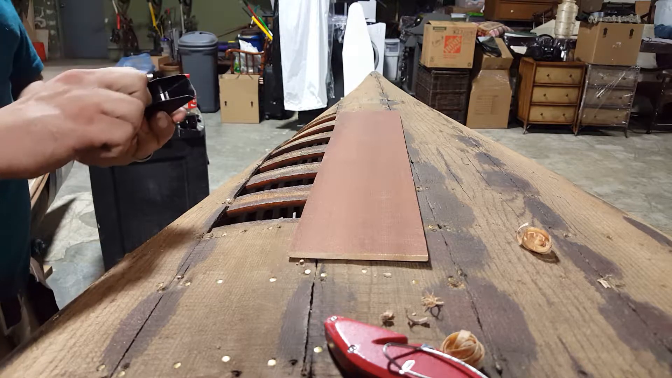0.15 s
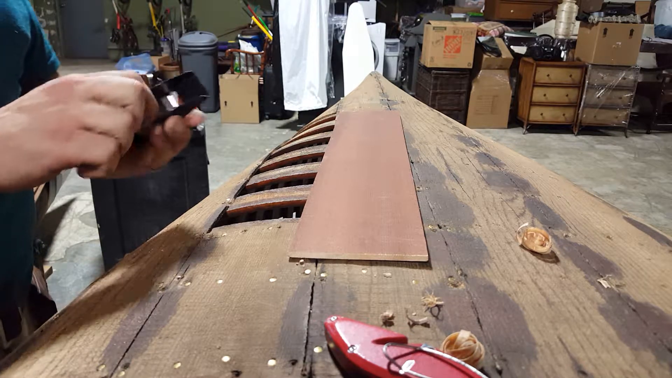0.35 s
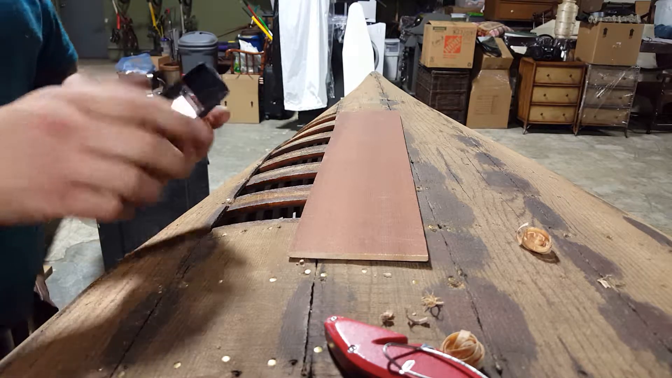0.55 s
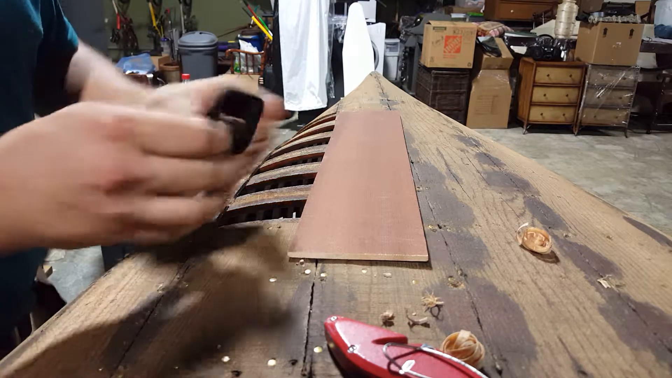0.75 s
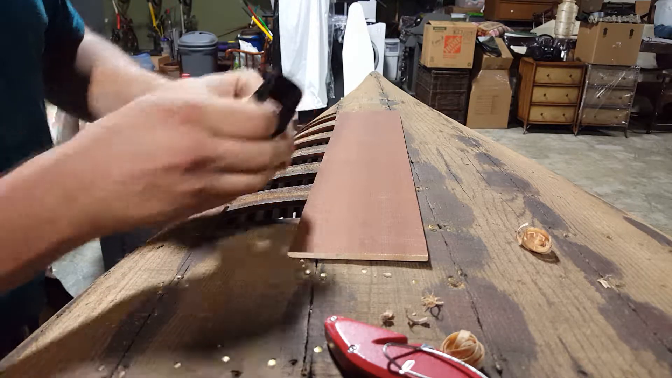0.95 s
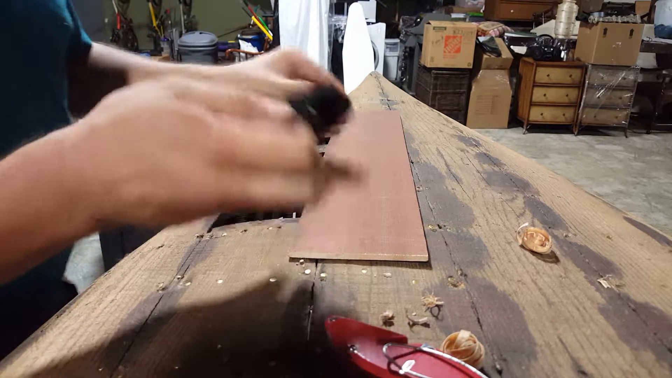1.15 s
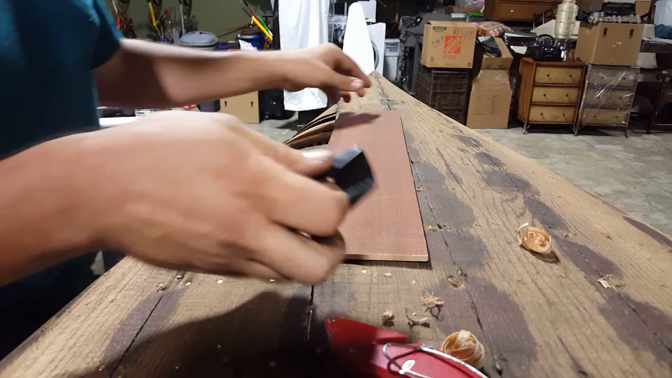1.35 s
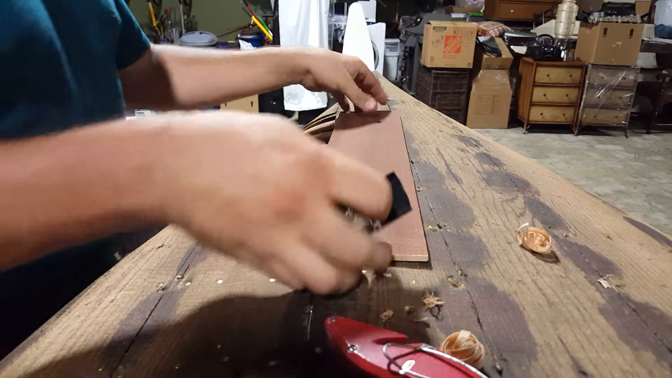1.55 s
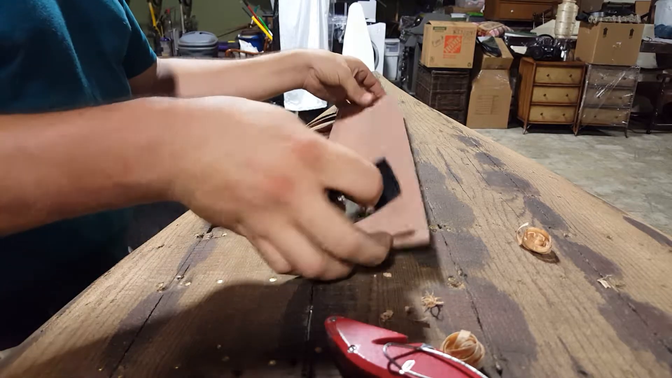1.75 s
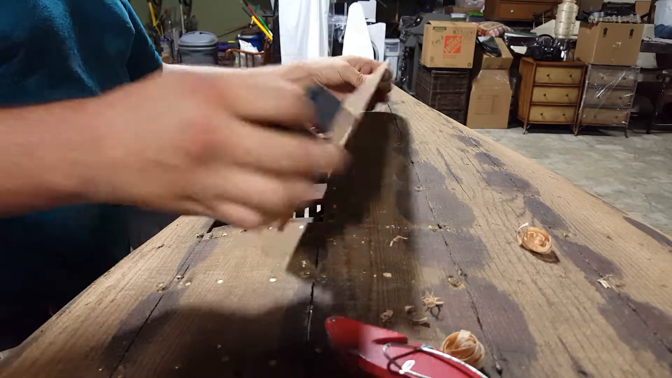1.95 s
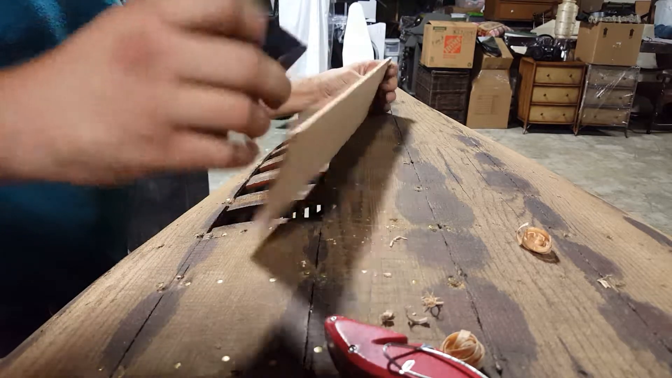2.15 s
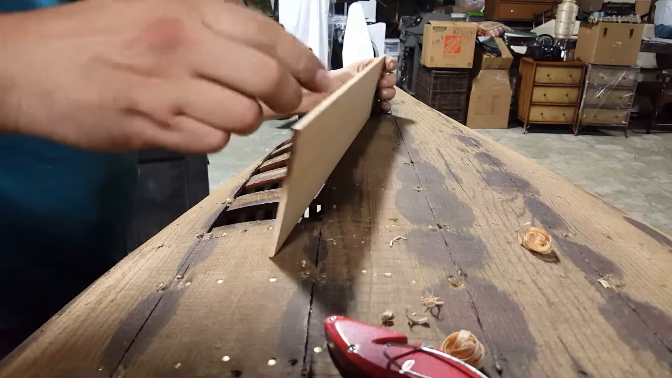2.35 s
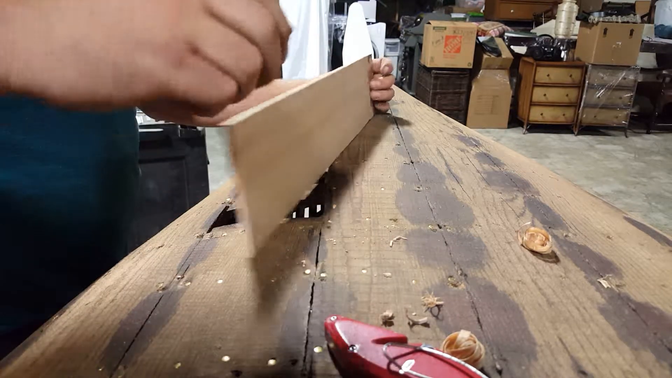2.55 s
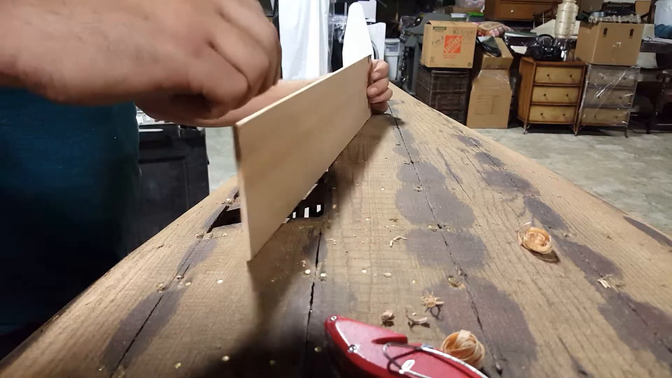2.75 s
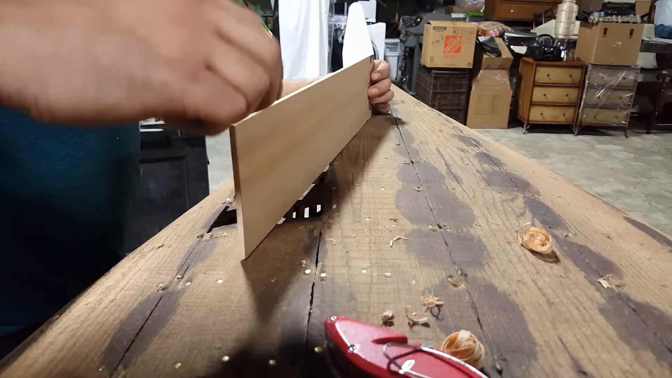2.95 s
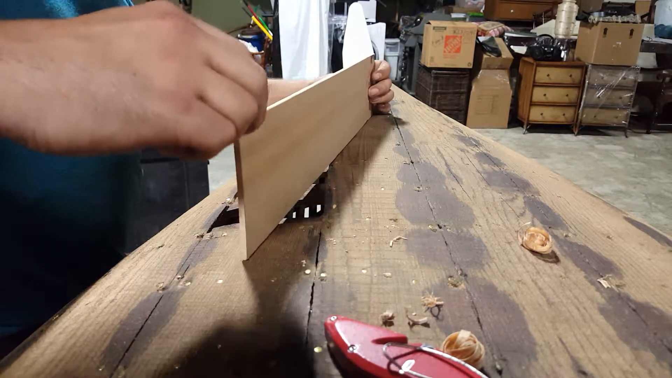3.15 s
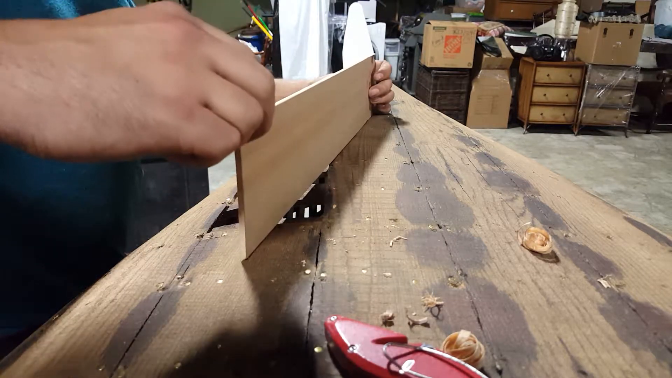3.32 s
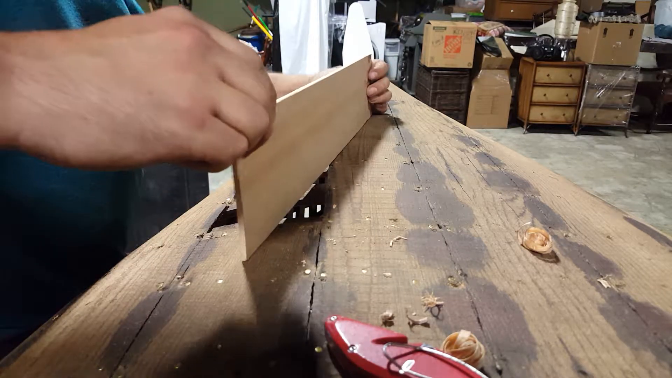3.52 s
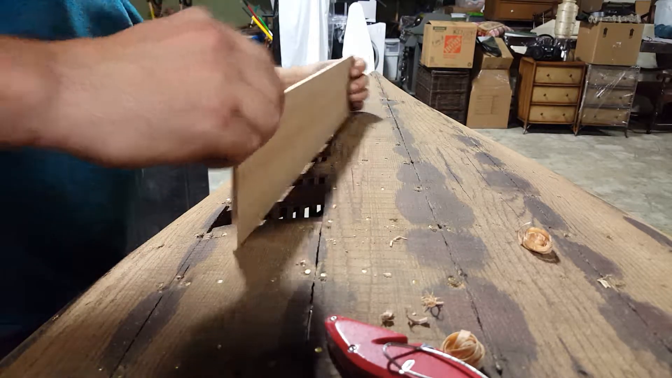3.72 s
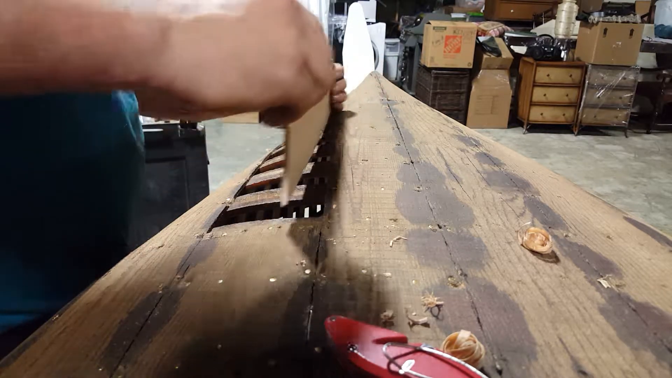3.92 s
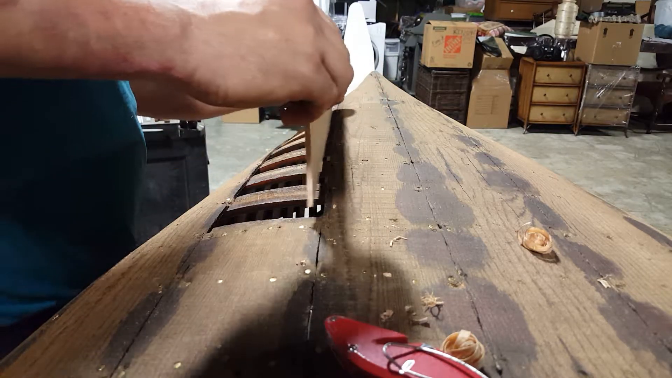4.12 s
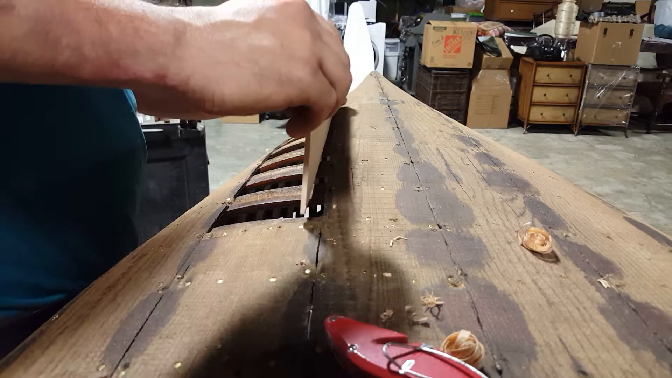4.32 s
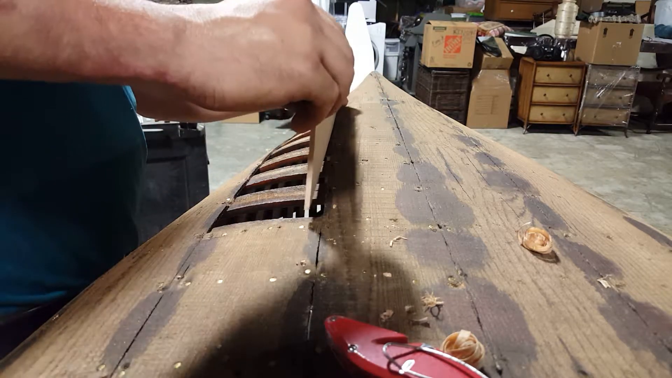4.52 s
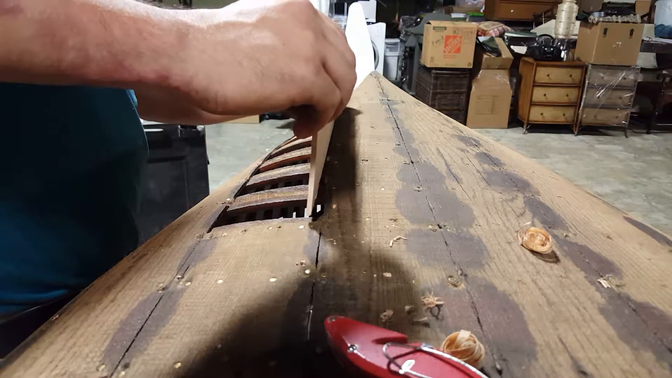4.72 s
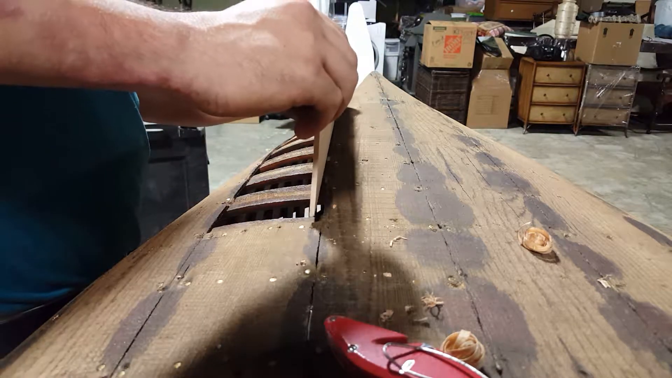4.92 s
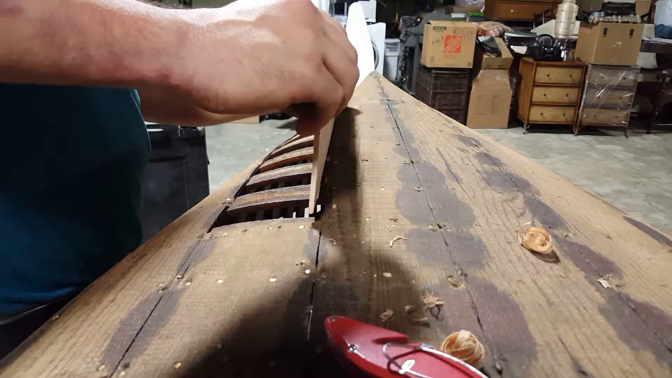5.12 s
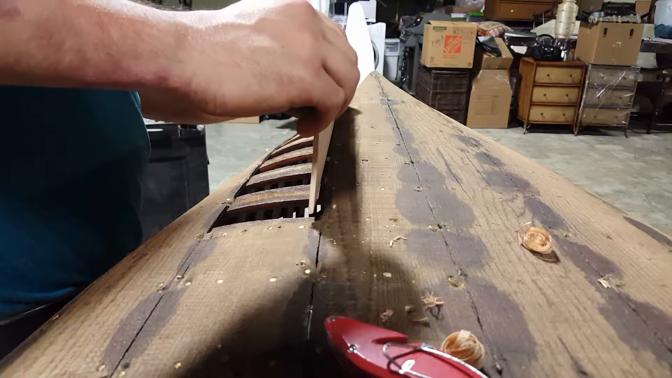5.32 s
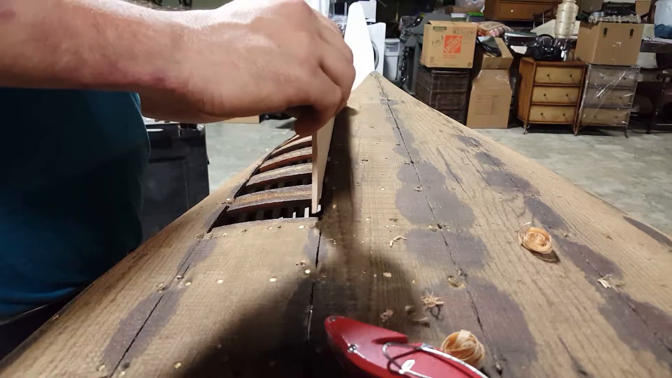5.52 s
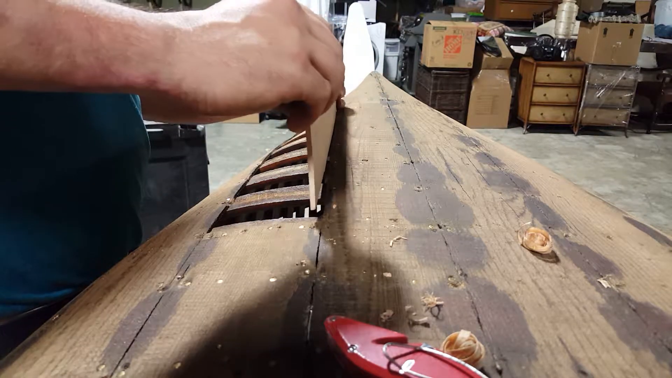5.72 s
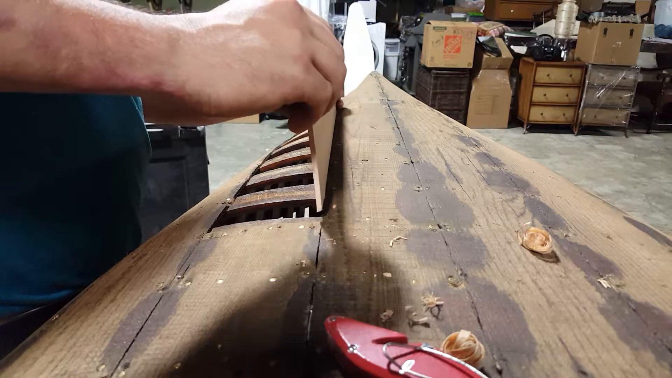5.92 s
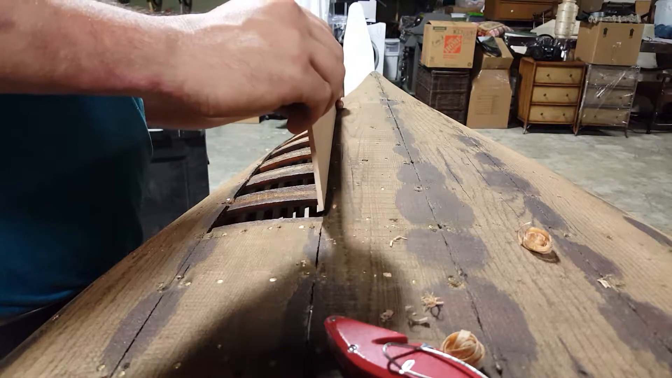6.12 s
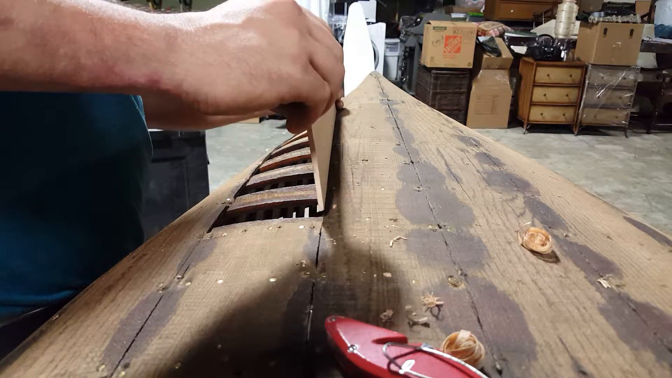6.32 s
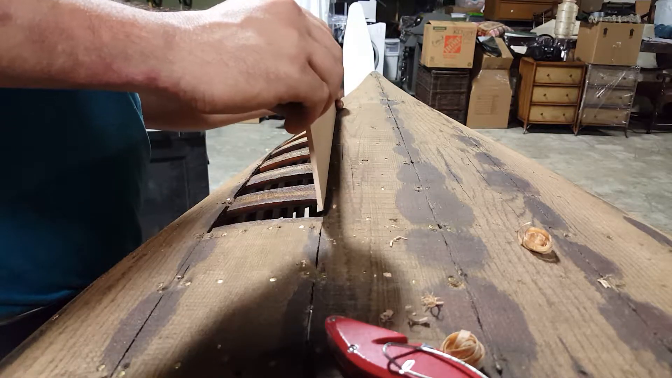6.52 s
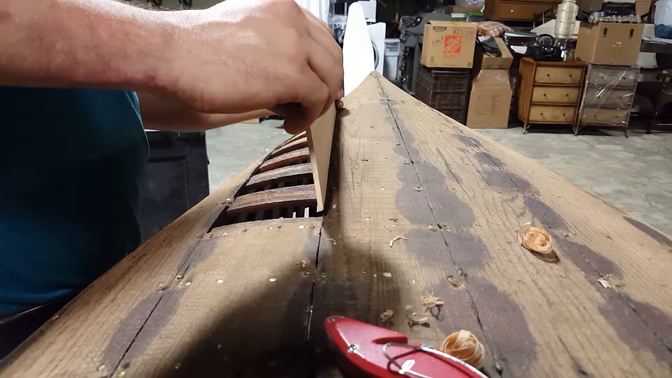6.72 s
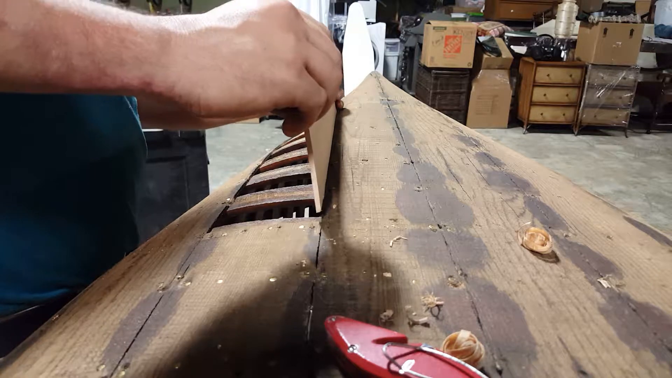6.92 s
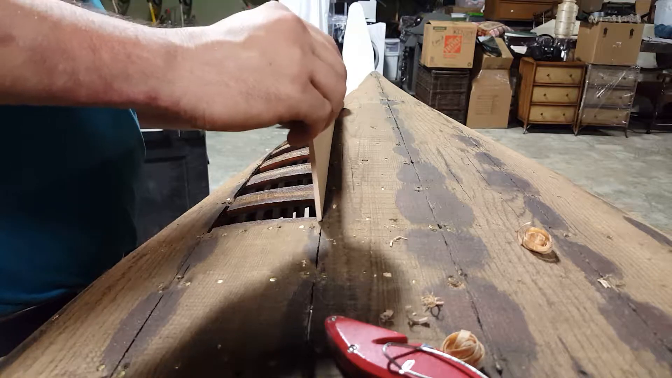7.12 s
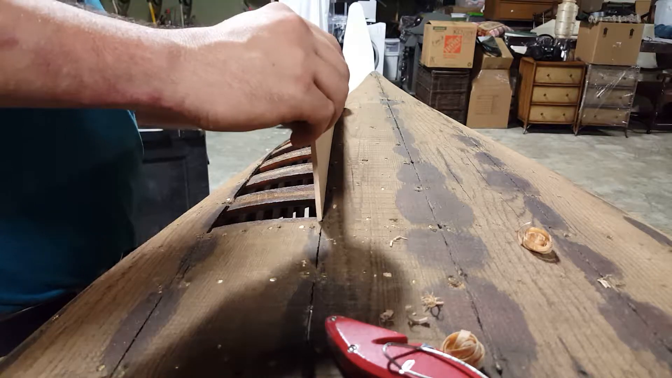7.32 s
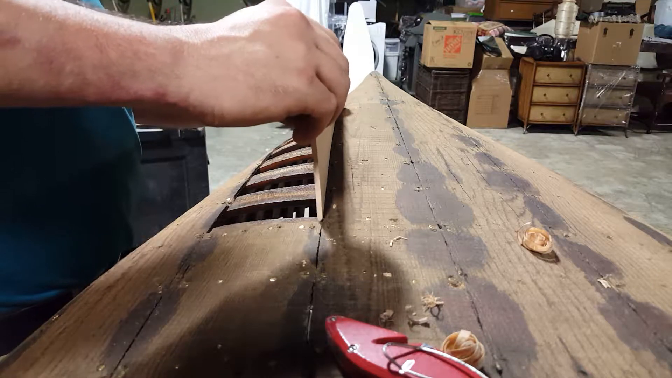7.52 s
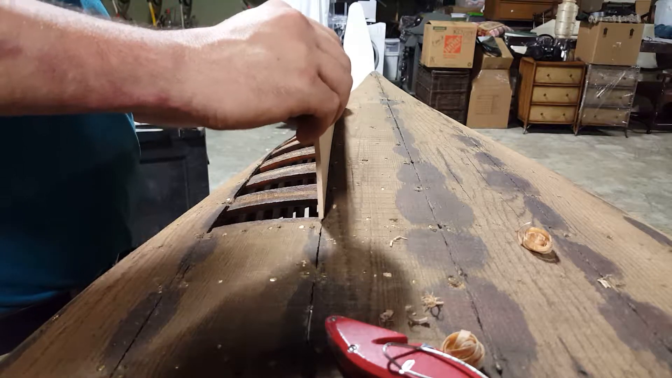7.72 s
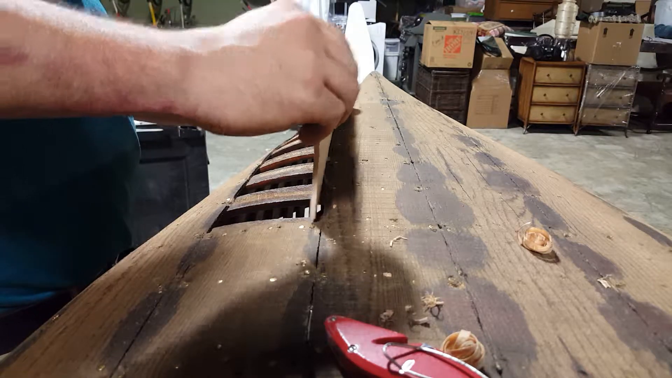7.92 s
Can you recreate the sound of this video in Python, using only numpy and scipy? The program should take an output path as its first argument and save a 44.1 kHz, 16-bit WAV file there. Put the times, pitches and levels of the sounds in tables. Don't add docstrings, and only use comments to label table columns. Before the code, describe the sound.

Wood scrapes and a loud hollow knock on a boat hull, then shuffling, a brief judder and a last sharp clack over low room rumble.

```python
import sys
import numpy as np
from scipy import signal
from scipy.io import wavfile

SR = 44100
rng = np.random.default_rng(int(sys.argv[2]) if len(sys.argv) > 2 else 0)


def int16_out(signal):
    q = np.round(np.clip(np.atleast_2d(signal).T, -1, 1) * 32767)
    wavfile.write(sys.argv[1], SR, q.astype(np.int16))


def invert_db(level):
    return 10 ** (np.asarray(level, dtype=float) / 20)


N = 351036
TIME = np.arange(N) / SR
LEFT_RIGHT = np.array([[1], [-1]])

# pitch_hz, level_db (per Hz)
RUMBLE_COLOUR = [(12, -44), (20, -12), (32, -26.5), (48, -13), (86, -8.5), (107, -17.5), (172, -1.5),
                 (210, -9), (337, -12), (590, -21), (759, -18.5), (1060, -24), (1810, -24), (4060, -35),
                 (16000, -46.5)]
# time_s, level_db
RUMBLE_LEVEL = [
    (0.0, -65),
    (7.96, -62.5),
]
# pitch_hz, likeness (-1 to 1)
LIKENESS = [(60, 0.92), (150, 0.91), (380, 0.87), (950, -0.36), (2380, 0.053), (5980, -0.37),
            (15000, -0.13)]
# pitch_hz, level_db (rms)
MOTOR_HUM = [(60, -77), (119, -78), (180, -73.5), (440, -84)]
# start_s, peak_db,
# brightness_db, left_right_db, left_lag_ms
CLACKS = [(0.374, -66, -8, -11, 0.0096), (0.8, -58, 5, -9, -0.079), (1.233, -51, 0, 7, -0.11),
          (1.7551, -38.5, -17, 1, -0.12), (1.8482, -48, -20, -0.5, -0.17), (1.8336, -51, -23, -4, -.09),
          (1.5343, -47, -22, -4, -.09), (3.735, -29, -19.5, -3, -.2), (2.0742, -35, -15, -7.5, -0.18),
          (2.1025, -24, -44, -12, -0.1), (2.2185, -11.5, -26, -4.5, -0.082),
          (2.226, -13.5, -40, -6, -0.089), (2.2673, -27, -20, -1, -0.073), (2.367, -33, -27, -2, -0.15),
          (2.5604, -41.5, -21.5, -14, -0.04), (2.588, -44, -13, 10, 0.00099), (3.6255, -39, -22, 0, -0.018),
          (3.7262, -28.5, -23, -6, -0.4), (3.7645, -30.5, -17, -3, -0.25), (4.096, -34, -32, 2.5, -0.13),
          (4.126, -41, -21, 0.5, -0.11), (5.677, -45, -20.5, -12, -0.21), (5.782, -45, -33, -16, -0.085),
          (7.277, -63, -15, -3, -0.19), (7.563, -37, -23, -4, -0.19), (7.8783, -16, 0, 6, -0.16),
          (7.88, -25.5, -4, -3, -0.26)]
# pitch_hz, level_db
CRACK_COLOUR = [(700, -31), (1500, -17), (2800, -8), (4200, -7), (5500, -22), (8200, -12.5), (10000, -29.5),
                (14000, -32)]
# start_s, peak_db, brightness_db, left_right_db, left_lag_ms
SNAPS = [
    (1.9748, -23.5, -0.5, -8, -0.05),
    (1.9770, -17, 1, -8, -0.1),
    (1.9803, -26, 0.5, -4, -0.15),
]
# pitch_hz, level_db, fade_60db_s
PLANK_MODES = [(520, -6, .035), (705, -11, 0.035), (1068, -16, .03), (1391, -13, .03), (1690, -11, 0.031),
               (2135, -4.5, 0.02406), (2475, -2, .03), (2700, -3, 0.027), (2995, -6, .025),
               (3140, -11, .015), (3648, -2, .03), (4230, -16.5, .012), (4845, -22, .01),
               (5850, -19.5, .01), (2510, 4, 0.0035)]
# pitch_hz, fade_60db_s
ROOM_FADE = [(80, 0.34), (250, 0.43), (700, 0.11), (2000, 0.31), (5000, 0.18), (12000, 0.17)]
# pitch_hz, echo_db
ROOM_LEVEL = [(80, -13), (180, -9), (400, -4), (750, -5.5), (1200, -10.5), (4000, -16), (10000, -16.5)]
# start_s, length_s, pitch_hz, level_db (rms)
SQUEAKS = [
    (0.486, 0.052, 8650, -88),
    (.603, 0.067, 9150, -91),
    (.69, 0.063, 9200, -91),
]
# pitch_hz, level_db, fade_60db_s
TOOL_MODES = [(2160, 9.5, 0.024), (2860, 9, 0.03), (3300, -4, .02), (3770, 9, 0.075), (4465, 9, 0.075),
              (6320, -5, .03), (7180, -4, 0.035), (8060, -1, .025), (8600, -2, 0.04), (11900, 0, .03),
              (14500, 1, .03)]
# start_s, level_db
TOOL_TICKS = [
    (.774, -68.5),
    (0.78, -70),
    (0.789, -63.5),
    (0.797, -68),
    (.804, -63),
]
# start_s, peak_db, hardness_db, left_right_db, left_lag_ms
KNOCKS = [(1.223, -46, -24, 0, -0.05), (1.533, -24.5, -84, 2, -0.05), (1.633, -22.5, -95, 2, -0.067),
          (1.68, -30, -47, 5.5, -0.059), (2.102, -23, -12, 2.5, -0.05), (2.217, 4, -14, 1.0, -0.12),
          (2.3, -26, -8, -1, -0.13), (2.33, -24, -9, 3, -0.12), (2.607, -26.5, -32, 1, -0.14),
          (2.634, -31.5, -23.5, -1, -.1), (3.679, -17.5, -35.5, 3.5, -0.061),
          (4.171, -21, -19.5, 2.5, -0.07), (4.5467, -34, 7.5, 5, -0.12), (4.5519, -38.5, 7, 9, -0.12),
          (4.5592, -37, 1, 3, -0.12), (5.524, -53, -33, -2.5, -0.056), (5.782, -36, -31, 0.5, -0.05),
          (5.797, -36, -30.5, 0.5, -0.053), (6.686, -62, -28, 4.5, -0.037), (7.047, -51, 19, -1, -0.091),
          (7.092, -31.5, -41.5, -4, -0.07), (7.563, -34, -20, 9, -0.078), (7.813, -31.5, -46, 4.5, -0.15),
          (7.878, -13.5, -53, 2.5, -0.12)]
# pitch_hz, level_db, fade_60db_s
HULL_MODES = [(109, -8.5, 0.39), (155.56, -3.5, 0.31), (218, -12, 0.063), (262.8, -11, 0.16),
              (323.6, -15, 0.69), (439.7, -2.5, 0.1), (584, -9.5, 0.13), (828, -11.5, 0.042),
              (720, -9, 0.25), (756.4, -13, 0.37), (875, -24, 0.097), (965, -14, 0.17), (1074, -29.5, 0.3),
              (1122, -24.5, 0.29), (1370, -16.5, 0.056), (1354, -13.5, 0.11), (1491, -19, 0.23)]
# peak_s, swell_s, fade_s, plank_db, hull_db
BRUSHES = [(1.236, 0.017, 0.077, -63, -59.5), (1.658, .07, 0.022, -52, -40.5),
           (1.685, 0.018, 0.036, -59, -48.5), (1.7696, 0.045, 0.028, -54.5, -47),
           (1.855, 0.021, 0.015, -49.5, -60), (2.265, 0.057, 0.081, -40.5, -34),
           (2.605, 0.087, 0.063, -55, -39), (2.756, 0.024, 0.025, -46, -52),
           (2.735, 0.045, 0.022, -45.5, -56), (2.658, 0.02, 0.0092, -46, -55),
           (2.155, .02, .03, -43.5, -50), (3.684, 0.01, .012, -38, -50), (3.697, 0.013, 0.014, -34, -49),
           (3.666, 0.0064, .015, -39, -46), (3.734, .015, 0.0094, -36.5, -51),
           (3.68, 0.071, 0.092, -40.5, -34.5), (3.81, 0.025, 0.013, -48.5, -39.5),
           (4.094, 0.05, 0.19, -58.5, -65), (4.19, 0.048, 0.094, -54.5, -47),
           (2.53, 0.019, 0.035, -52.5, -41), (2.6, .005, 0.024, -47, -52), (2.59, .003, .02, -46.5, -58),
           (2.776, 0.0064, 0.0056, -52, -54), (2.2, 0.0072, 0.0112, -57.5, -54),
           (3.64, 0.0043, .02, -47, -51.5), (3.766, 0.0039, 0.012, -38, -33),
           (1.5343, 0.0023, 0.016, -65, -43), (5.679, 0.0093, 0.054, -59.5, -47.5),
           (5.79, 0.01, 0.038, -69, -53), (7.565, 0.0056, 0.024, -55, -45), (7.6, 0.054, 0.07, -74, -49),
           (7.821, 0.011, 0.038, -58.5, -36.5)]
# start_s, length_s, plank_start_db, plank_end_db, hull_db
DRAGS = [(1.549, 0.055, -78, -71, -44), (1.877, 0.08, -58, -57.5, -60.5), (2.003, .09, -57.5, -59.5, -62),
         (2.132, 0.047, -43, -43, -43), (2.311, 0.19, -58, -62.5, -43.5), (2.599, 0.084, -50, -51.5, -49),
         (2.688, 0.116, -51, -60, -45.5), (3.494, 0.15, -61, -54.5, -66.5), (3.638, 0.019, -44, -41.5, -37),
         (3.66, 0.076, -40, -40, -40.5), (3.945, 0.14, -66, -62.5, -67), (4.145, 0.04, -55, -63, -74),
         (7.919, 0.057, -49, -60, -56.5)]
# peak_s, swell_s, fade_s, plank_db, hull_db
RUBS = [
    (1.59, 0.039, 0.011, -55, -54),
    (4.524, 0.02, .025, -53.5, -54),
    (4.535, 0.033, 0.029, -52, -46),
    (4.556, 0.019, 0.02, -50, -51),
    (7.066, 0.14, 0.092, -66, -49.5),
    (7.098, 0.051, 0.02, -52.5, -52),
    (7.889, .003, 0.055, -51, -48),
]
# time_s, left_right_db
CONTACT_PAN = [(1.2, -7), (1.6, -10), (2.0, -6), (2.159, -10), (2.3, -9.5), (2.7, -13), (3.7, -7),
               (4.099, -3.5), (4.499, -1.5), (5.7, -1), (7.1, -7.5), (7.6, 4.5), (7.96, -4.5)]
# pitch_hz, level_db (per Hz)
SCRAPE_COLOUR = [(600, -12), (1200, -12.5), (1900, -7.5), (2300, -8), (2750, -3), (3000, -2.5), (3350, -1),
                 (4000, -0.5), (4700, -7.5), (5200, -17.5), (5900, -24), (7000, -28), (8800, -31),
                 (10000, -33.5), (15000, -38)]
# pitch_hz, left_right_db
SCRAPE_SIDE = [(60, 2.0), (110, 1.5), (200, -1.0), (380, 0), (700, 3.5), (1290, -9), (2380, -20.5),
               (4400, 5.5), (8120, 11.5), (15000, 3)]
# pitch_hz, level_db (over the scrape)
EDGE_MODES = [(2750, -3), (3349, -5), (3950, -7), (4600, -8)]
# peak_s, swell_s, fade_s, level_db
LEANS = [
    (1.6, .05, .08, -53),
    (1.7, .06, 0.11, -56),
    (3.72, .05, 0.087, -63),
    (7.1, 0.048, .1, -60),
]
# start_s, length_s, from_hz, to_hz, peak_db
FALLING_TONES = [
    (2.218, 0.12, 158.1, 151, -20.5),
    (2.238, 0.057, 520, 290, -28.5),
    (2.25, 0.04, 668, 520, -31),
    (2.255, 0.032, 820, 720, -38),
    (2.281, 0.0397, 419.6, 258, -33),
    (2.354, 0.038, 1010, 910, -46),
    (5.776, 0.039, 400, 340, -50.5),
    (5.801, 0.056, 339, 297, -57),
]
# start_s, peak_db
JUDDER_SLIPS = [(4.509, -45), (4.516, -43.5), (4.519, -37), (4.5228, -37), (4.526, -45), (4.5287, -36),
                (4.532, -33.5), (4.5348, -43), (4.537, -38), (4.543, -33.5), (4.548, -38), (4.551, -38),
                (4.558, -38)]
# pitch_hz, level_db, fade_60db_s
RIB_MODES = [(610, -0.5, 0.015), (910, -11.5, 0.025), (1130, -4, 0.038), (1610, -5.5, 0.022),
             (2360, -7, 0.027), (2830, -8, .02), (3500, -10, 0.013), (4010, -3, .025), (4720, -14, 0.013),
             (5800, -19, .02)]


def rms_one(x):
    return x / np.sqrt(np.mean(x ** 2) + 1e-20)


def at_hz(points, hz):
    pitch_hz, value = np.transpose(points)
    return np.interp(np.log(hz), np.log(pitch_hz), value)


def over_time(points):
    return np.interp(TIME, *np.transpose(points))


def filtered(x, order, hz, kind="low"):
    return signal.sosfilt(signal.butter(order, hz, kind, fs=SR, output="sos"), x)


def drift(rate_hz):
    r = np.exp(-80 * np.pi * rate_hz / SR)
    slow = signal.lfilter([1], [1, -2 * r, r * r], rng.standard_normal(N // 40 + 2002))[2000:]
    return np.interp(np.arange(N) / 40, np.arange(len(slow)), rms_one(slow))


def ring(clicks, hz, t60):
    r = invert_db(-60 / (max(t60, 1e-3) * SR))
    w = 2 * np.pi * hz / SR
    return signal.lfilter([0, np.sin(w)], [1, -2 * r * np.cos(w), r * r], clicks + 1e-18)


def bands(white):
    edges = 20 * 2 ** np.arange(0, 10, .45)
    for k, (low, high) in enumerate(zip(edges, edges[1:])):
        yield np.sqrt(low * high), filtered(white[k % 2], 2, [low, high], "band")


def widen(mid, side, alike):
    return np.sqrt(1 + alike) * mid + np.sqrt(1 - alike) * side * LEFT_RIGHT


def rumble():
    out, together = 0, drift(2.3)
    for hz, (mid, side) in bands(rng.standard_normal((2, 2, N))):
        alike = np.clip(at_hz(LIKENESS, hz), -1, 1)
        flicker_db = 1.2 * (together + drift(8)) / (1 + hz / 1500)
        out = out + invert_db(at_hz(RUMBLE_COLOUR, hz) + flicker_db) * widen(mid, side, alike)
    return invert_db(over_time(RUMBLE_LEVEL) + 2.0) * rms_one(out)


def hum():
    out = 0
    for hz, db in MOTOR_HUM:
        level = invert_db(db + 4 + 3.4 * drift(2.7))
        out = out + level * np.sin(2 * np.pi * hz * TIME + 0.31 * drift(4.5))
    return out


def hiss():
    return invert_db(-81) * rms_one(filtered(rng.standard_normal((2, N)), 4, 11500, "high"))


def strike(rows, modes, signs, knee_hz, trim_db, spread_db, smear_ms):
    s, db, hard_db, pan_db, lag_ms = np.transpose(rows)
    chance = rng.standard_normal((len(rows), 48))
    late = rng.exponential(1, (len(rows), 48))
    facing_db, out = 2.0 * rng.standard_normal(48), np.zeros((2, N))
    for k, (hz, mode_db, t60) in enumerate(modes):
        at = (np.array([s + lag_ms / 1000, s]) + late[:, k] * smear_ms / 1000) * SR
        whole = at.astype(int)
        part = at - whole
        reach = hz ** 2 / (hz ** 2 + knee_hz ** 2)
        side_db = (pan_db + facing_db[k]) / 2 * LEFT_RIGHT
        hit_db = db + trim_db + mode_db + reach * hard_db + spread_db * chance[:, k]
        size = signs[k] * invert_db(hit_db + side_db)
        clicks = np.zeros((2, N))
        for ear in range(2):
            np.add.at(clicks[ear], whole[ear], size[ear] * (1 - part[ear]))
            np.add.at(clicks[ear], whole[ear] + 1, size[ear] * part[ear])
        out += ring(clicks, hz, t60)
    return out


def clacks():
    rows = [(s, db, bright_db + 13.5, pan, lag) for s, db, bright_db, pan, lag in CLACKS]
    crowd = [(hz, at_hz(CRACK_COLOUR, hz), 22 / hz ** 0.87) for hz in np.geomspace(700, 14000, 26)]
    crack = strike(rows, crowd, (-1) ** np.arange(48), knee_hz=4500, trim_db=-3, spread_db=2.5, smear_ms=.3)
    snap = strike(SNAPS, PLANK_MODES, np.ones(48), knee_hz=4500, trim_db=-6, spread_db=1.5, smear_ms=.05)
    return crack + filtered(snap, 2, [1300, 4800], "band")


def room_echo(x):
    t, tail = np.arange(SR) / SR, 0
    for hz, (mid, side) in bands(rng.standard_normal((2, 2, SR))):
        alike = np.clip(.85 * at_hz(LIKENESS, hz), 0, 1)
        t60 = at_hz(ROOM_FADE, hz)
        fade = invert_db(-60 * t / t60 + at_hz(ROOM_LEVEL, hz)) / np.sqrt(t60 * SR / np.log(1e6))
        tail = tail + fade * widen(mid, side, alike)
    tail = tail * (1 - np.exp(-t / .006))
    return signal.fftconvolve(x.mean(axis=0)[None], tail, axes=1)[:, :N]


def squeaks():
    arch_hz, sag_hz, wobble_hz = 202, 250, 40
    out, wobble = 0, drift(60)
    for s, length, hz, db in SQUEAKS:
        along = np.clip((TIME - s) / length, 0, 1)
        arch = np.sin(np.pi * along)
        pitch = hz + arch_hz * (arch - 1) - sag_hz * along ** 2 + wobble_hz * wobble
        level = invert_db(db + 9 + 2.0 * wobble) * np.sqrt(np.abs(arch)) * (along < 1)
        out = out + level * np.sin(2 * np.pi * np.cumsum(pitch) / SR)
    return out


def tool():
    rows = [(s, db, 0, 1.5, -.15) for s, db in TOOL_TICKS]
    return strike(rows, TOOL_MODES, np.ones(len(TOOL_MODES)), knee_hz=1000, trim_db=0, spread_db=5.0, smear_ms=2)


def knocks():
    rows = [(s + 0.00042, db, hard_db + 13.0, pan, lag) for s, db, hard_db, pan, lag in KNOCKS]
    thud = [(212, -0.5, 0.055), (520, 2.5, 0.015), (635, -7, 0.028)]   # pitch_hz, level_db, fade_60db_s
    modes = [(hz, db - 9.5, 0.78 * t60) for hz, db, t60 in HULL_MODES] + thud
    signs = []
    for k, (hz, _, _) in enumerate(modes):
        signs.append(1 if hz < 400 else -1 if hz < 560 else (-1) ** k)
    rung = strike(rows, modes, signs, knee_hz=900, trim_db=-10, spread_db=1.5, smear_ms=0)
    return filtered(rung, 2, 2500)


def contact(start_s, hold_s, swell_s, fade_s, start_db, end_db):
    corners = start_s + np.cumsum([-3 * swell_s, 3 * swell_s, hold_s + 1e-4, 3 * fade_s])
    levels = [start_db - 60, start_db, end_db, end_db - 60]
    return invert_db(2 * np.interp(TIME, corners, levels, left=-200, right=-200))


def pressure():
    rows = []
    for s, swell, fade, db, hull_db in BRUSHES:
        rows.append((s, 0, swell, fade, db, db, hull_db, -6, -10))
    for s, swell, fade, db, hull_db in RUBS:
        rows.append((s, 0, swell, fade, db, db, hull_db, 1, -9))
    for s, length, db, end_db, hull_db in DRAGS:
        rows.append((s, length, 0.0067, .015, db, end_db, hull_db, -10.5, -10.5))
    share = 0.4
    power = np.full((4, N), 1e-14)
    for s, hold, swell, fade, db, end_db, hull_db, body_db, bright_db in rows:
        plank = contact(s, hold, swell, fade, db, end_db)
        hull = contact(s, hold, swell, fade, hull_db, hull_db)
        body = invert_db(2 * body_db) * plank ** (1 - share) * hull ** share
        power += [plank, hull, body, invert_db(2 * bright_db) * plank]
    return 10 * np.log10(power)


def grit(per_s, uneven_db, clump_db):
    sizes_db = uneven_db * np.minimum(rng.exponential(1, N), 5) + clump_db * drift(47.56)
    return invert_db(sizes_db) * rng.choice([-1, 1], N) * (rng.random(N) < per_s / SR)


def scraped_plank():
    wander_db, cycles = 2.5, 17
    fibres = grit(per_s=22000, uneven_db=3.2, clump_db=2.2)
    dealt, parts = rng.integers(0, 42, N), np.zeros((3, 2, N))
    for k, hz in enumerate(np.geomspace(600, 15000, 42)):
        facing_db = at_hz(SCRAPE_SIDE, hz) - at_hz(SCRAPE_SIDE, 3000) + 3.0 * rng.standard_normal()
        sides = invert_db(facing_db / 2 * LEFT_RIGHT) * [[1], [np.sign(np.cos(k * hz / 9000))]]
        clicks = fibres * (dealt == k) * invert_db(wander_db * drift(9))
        note = sides * invert_db(at_hz(SCRAPE_COLOUR, hz)) * hz * ring(clicks, hz, cycles / hz)
        parts[np.searchsorted([1700, 5300], hz)] += note
    for k, (hz, db) in enumerate(EDGE_MODES):
        clicks = fibres * (dealt == 9 * k) * invert_db(wander_db * drift(18))
        parts[1] += invert_db(at_hz(SCRAPE_COLOUR, hz) + db) * hz * ring(clicks, hz, 0.016)
    return [rms_one(part) for part in parts]


def scraped_hull():
    bumps = grit(per_s=2500, uneven_db=2.0, clump_db=2.0)
    low = [mode for mode in HULL_MODES if mode[0] < 620]
    dealt, out = rng.integers(0, len(low), N), 0
    for k, (hz, db, t60) in enumerate(low):
        sides = invert_db(1.1 * db + 2.9 * (-1) ** k * LEFT_RIGHT)
        out = out + sides * ring(bumps * (dealt == k), hz, 0.079 * t60)
    return rms_one(out)


def scraping():
    plank_db, hull_db, body_db, bright_db = pressure()
    body, edge, bright = scraped_plank()
    plank = invert_db(plank_db) * edge + invert_db(body_db) * body + invert_db(bright_db) * bright
    plank = plank * invert_db(over_time(CONTACT_PAN) / 2 * LEFT_RIGHT)
    return plank + invert_db(hull_db - 3.5) * scraped_hull()


def leans():
    shudder = filtered(rng.standard_normal((2, N)), 2, [42, 85], "band")
    power = sum(contact(s, 0, swell, fade, db, db) for s, swell, fade, db in LEANS)
    return np.sqrt(power) * rms_one(shudder[0] + .4 * shudder[1] * LEFT_RIGHT)


def falling_tones():
    out = 0
    for s, length, from_hz, to_hz, db in FALLING_TONES:
        along = np.clip((TIME - s) / length, 0, 1)
        pitch = from_hz + (to_hz - from_hz) * along
        out = out + invert_db(db) * np.sin(np.pi * along) ** 2 * np.sin(2 * np.pi * np.cumsum(pitch) / SR)
    return out * invert_db(.5 * LEFT_RIGHT)


def judder():
    rows = [(s, db, 0, -3, -.1) for s, db in JUDDER_SLIPS]
    signs = (-1) ** np.arange(48)
    return strike(rows, RIB_MODES, signs, knee_hz=1000, trim_db=-7, spread_db=4.0, smear_ms=.6)


def scene():
    near = clacks() + tool() + knocks() + scraping() + falling_tones() + judder()
    near = filtered(near, 5, 74, "high")
    near = near + room_echo(near)
    shaded = filtered(near, 6, 9300)
    leak = invert_db(-7) * filtered(near, 4, 10500, "high")
    return shaded + leak + rumble() + hum() + hiss() + squeaks() + leans()


def low_pass(x):
    return signal.sosfilt(signal.butter(12, 15780, fs=SR, output="sos"), x)


def record(dry):
    rounded = dry / (1 + (dry / 1.1) ** 4) ** .25
    return low_pass(rounded)


dry = scene()
out = record(dry)
int16_out(out)
```